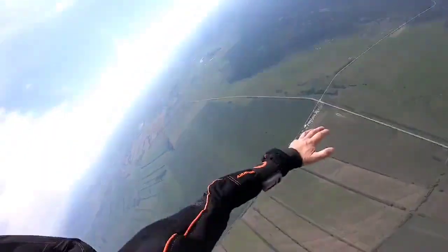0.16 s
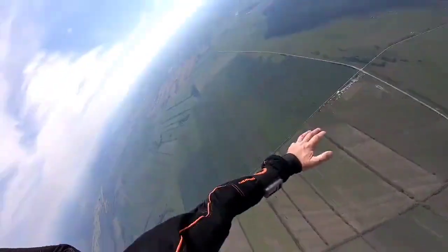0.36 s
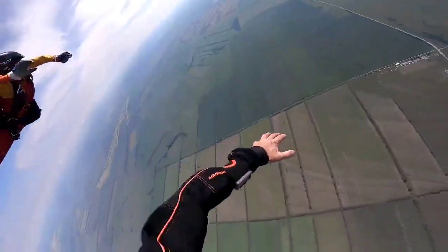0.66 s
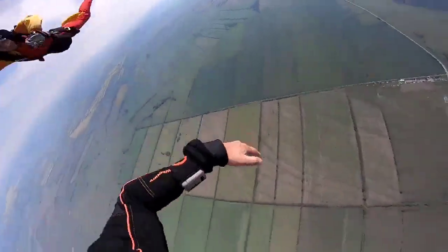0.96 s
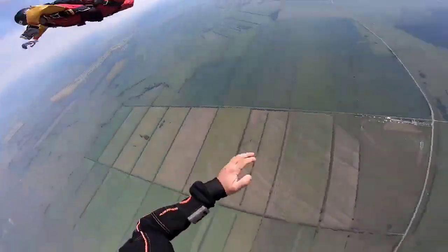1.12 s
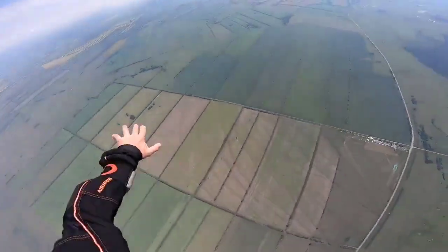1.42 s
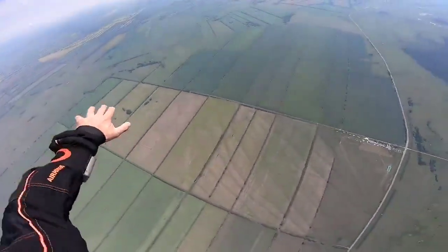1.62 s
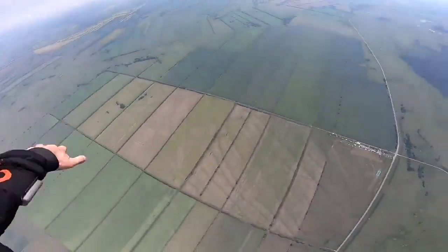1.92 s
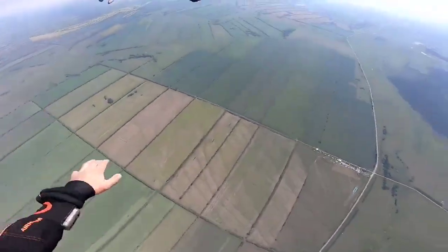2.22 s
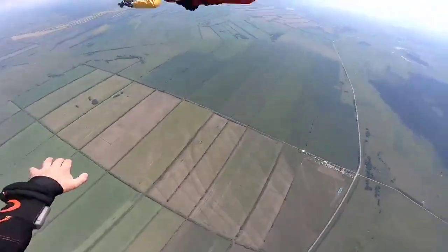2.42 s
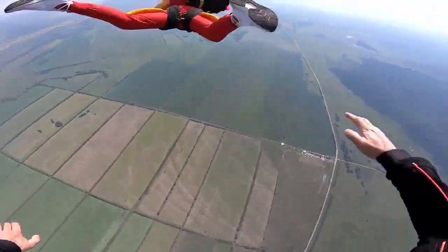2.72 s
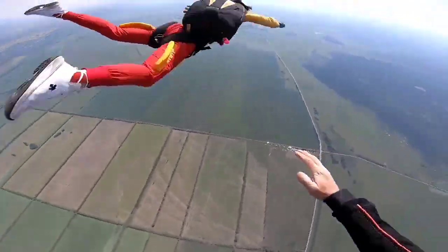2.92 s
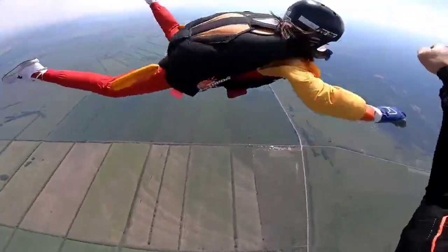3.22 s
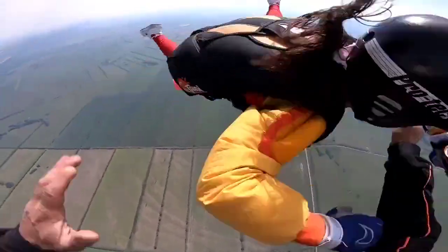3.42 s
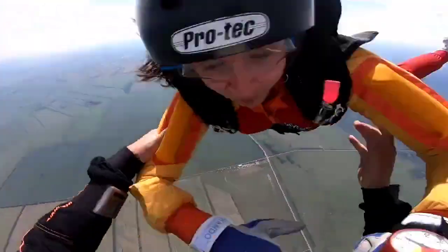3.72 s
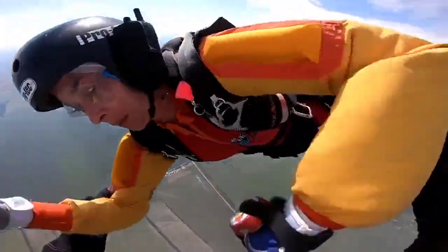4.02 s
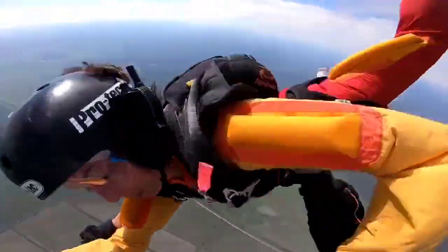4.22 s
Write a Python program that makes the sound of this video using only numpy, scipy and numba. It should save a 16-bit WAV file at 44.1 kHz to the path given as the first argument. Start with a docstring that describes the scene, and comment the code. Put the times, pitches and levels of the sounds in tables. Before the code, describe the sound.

Continuous loud freefall wind, heard from a camera worn by a skydiver high above farmland. Low buffeting and gusty roar lie under a brighter rush with a slight hollow ring. The rush peaks around one second, then recedes as the roar deepens and turns ragged, with short air slaps and tiny dips near the end. Close, dry, identical in both channels, no echo, dull at the very top.

```python
"""Freefall: air tears past a camera worn by a skydiver.
Big eddies buffet the microphone as low noise, and vortices peel off the body as a droning band of wandering pitch.
Middling eddies roar in gusts; smaller ones slap, rush and hiss at the port, whose ring near 3 kHz shifts with
the flow. A thin whistle fades early on. As the diver turns and closes on a partner, the camera moves in and out
of the wake, mostly deeper, and the roar sinks and grows ragged with it."""
import sys
import numpy as np
from scipy import signal
from scipy.fft import rfft, irfft
from scipy.io import wavfile
from scipy.ndimage import uniform_filter1d, minimum_filter1d
from numba import njit

SR = 44100
rng = np.random.default_rng(int(sys.argv[2]) if len(sys.argv) > 2 else 0)


def transcribe(signal):
    """Save signal, clipped to [-1, 1], as a 16-bit WAV file at the path in sys.argv[1]."""
    frames = np.atleast_2d(signal).T
    limited = np.clip(frames, -1, 1)
    pcm = np.round(limited * 32767).astype(np.int16)
    wavfile.write(sys.argv[1], SR, pcm)


N = 192364

# Flow across the port. Each row: time in seconds, rush in dB, hiss in dB, both before their trims.
PORT_FLOW = [(0, -26, -43.5), (.1, -21.5, -39), (.19, -25, -51.5), (.33, -31.5, -53.5), (.58, -23.5, -48.5),
             (.8, -21, -52.5), (.93, -20, -43.5), (1.1, -21.5, -47.5), (1.34, -23, -45.5),
             (1.62, -26.5, -49.5), (1.76, -24.5, -45.5), (2.2, -24, -45), (2.7, -28.5, -50),
             (2.88, -27, -48.5), (3.2, -31, -53), (3.52, -28.5, -50.5), (3.74, -32, -55),
             (3.815, -34, -55.5), (3.85, -28, -51.5), (3.92, -28, -53), (4.02, -32, -53.5),
             (4.28, -32.5, -55), (4.36, -27.5, -47)]
RUSH_TRIM_DB, HISS_TRIM_DB = -0.03, 1
# Noise colour of the largest eddies. Each row: frequency in Hz, density in dB per Hz.
BUFFET_COLOUR = [(12, -49.5), (25, -12.5), (40, -6.5), (60, 0), (78, 0.5), (115, -3), (150, -9),
                 (260, -15.5)]
# Noise colour of the finest eddies. Each row: frequency in Hz, density in dB per Hz.
HISS_COLOUR = [(2800, -19.5), (3600, 4), (4000, 2.5), (4400, 2), (4750, -3), (5250, -3.5), (5900, -7.5),
               (7300, -6.5), (8200, -28)]
# Noise colour of air that grazes the port. Each row: frequency in Hz, density in dB per Hz.
GRAZING_COLOUR = [(400, 7), (900, 6), (1300, 3.5), (1650, -2), (2000, -0.5), (2800, -1.5), (3300, -6.5),
                  (3600, -14), (4400, -27.5)]
# Noise colour of air that hits the port head-on. Each row: frequency in Hz, density in dB per Hz.
HEAD_ON_COLOUR = [(220, 3), (380, -1), (600, -5), (950, -2), (1400, 0.5), (1900, -2.5), (2800, -8.5),
                  (3350, -11), (3650, -20.5), (4400, -27.5)]
# How the air meets the port as the diver turns. Each row: time in seconds, share that hits head-on from 0 to 1.
HEAD_ON_SHARE = [(0, 0.54), (.3, 1), (.9, 0.78), (1.3, 0.45), (1.5, 0), (2.1, 0.21), (2.9, 0.05), (3.5, 0),
                 (3.74, 0.6), (3.88, 0.9), (4.05, 0.1), (4.36, 0)]
# The two resonances of the port cavity. Each row: width in Hz, average lift in dB.
PORT_RESONANCES = [(330, 3.5), (240, 7.5)]
# They shift with the angle of the flow. Each row: time in seconds, lower centre in Hz, upper centre in Hz.
PORT_CENTRES = [(0, 2400, 3050), (.6, 2400, 3220), (1, 2480, 3270), (1.499, 2470, 3260), (2.3, 2490, 3130),
                (2.8, 2430, 3130), (3.5, 2430, 3130), (4, 2500, 3240), (4.36, 2600, 3170)]
PORT_WAVER_DB = 2
# The camera in the body's wake. Each row: time in seconds, depth from 0 in clean air to 1 at its deepest.
WAKE_DEPTH = [(0, 0.31), (.5, 0.41), (.95, 0.15), (1.18, 0.35), (1.28, 0.6), (1.55, 0.41), (2.1, 0.74),
              (2.55, 0.56), (3.05, 0.55), (3.95, 0.82), (4.36, 1)]
# Each pair: value in clean air, value deep in the wake.
ROAR_DB, ROAR_HZ, FLUTTER_DB = (-29, -23.5), (560, 333), (-0.1, 6.5)
ROAR_WIDTH = 1.61  # share of its centre, per filter pass
# Gusts that swell the roar and move it to a band of their own, mostly narrower. Each row: start in seconds,
# length in seconds, lift in dB, centre in Hz, width per filter pass as a share of the centre.
ROAR_GUSTS = [(0.164, 0.17, 7, 400, 1.9), (0.289, 0.12, 2.5, 830, 1.35), (1.409, 0.3, 4.5, 495, 0.77),
              (2.039, 0.24, 2.5, 467, 1.5), (2.361, 0.473, 5, 495, 0.98), (2.785, 0.33, 4.5, 550, 1)]
GUST_ATTACK_S, GUST_RELEASE_S = 0.013, 0.09
# Moments when the wind mostly drops. Each row: middle in seconds, length in seconds, dip of rush and hiss in dB,
# dip of the roar in dB, dip of the large eddies in dB; a negative dip is a lift.
WIND_LULLS = [(0.302, .07, 3, 1.5, 2), (.535, 0.057, 1, 2, 4.5), (0.856, .06, 0.5, 10, 4),
              (1.101, 0.056, 0.5, -3, 7.5), (1.175, 0.075, -2, -1, 5), (1.688, 0.045, 2, 9, 11.5),
              (1.95, 0.047, 2.5, -3, 6.5), (2.13, 0.069, -0.5, 3, 3), (2.574, 0.08, -2.5, 9, -0.5),
              (3.03, 0.032, 0, 11, -1), (3.163, .06, 4, 4, -1.5), (3.262, 0.037, 4, 3.5, 2.5),
              (3.305, 0.032, -2.5, -1, 0.5), (3.392, .03, 3.5, 5, 2), (3.642, 0.035, 2, 11, -0.5),
              (3.721, 0.06, -1.5, 5.5, 1), (4.033, 0.1, 2, 4.5, -1), (4.188, 0.056, 5, 22, 5.5),
              (4.25, 0.033, 0.5, 8, -5)]
# Push of the largest eddies. Each row: time in seconds, level in dB.
BUFFET_LEVEL = [(0, -19.5), (.24, -13.5), (.38, -18), (.62, -18.5), (1.05, -18), (1.5, -15), (2.45, -14.5),
                (2.7, -18.5), (3.2, -17), (4.1, -20.5), (4.3, -15)]
# Vortices shed by the body. Each row: time in seconds, average shedding rate in Hz, level in dB.
BODY_SHEDDING = [(0, 130, -22.5), (.3, 129, -20.5), (.5, 112, -13.5), (.75, 120, -17.5), (1.05, 137, -17),
                 (1.3, 174, -14.5), (1.55, 195, -14.5), (1.85, 181, -16.5), (2.05, 202, -18.5),
                 (2.25, 163, -17.5), (2.55, 169, -16), (2.85, 200, -14), (3.15, 206, -12.5),
                 (3.65, 183, -11.5), (3.95, 198, -13), (4.15, 197, -13.5), (4.36, 177, -19)]
BODY_SPAN_S = .035
# Single eddies that slap the port, big ones low, small ones high. Each row: start in seconds, length in seconds,
# level in dB before the trim (a very short slap stays under it), centre in Hz.
SLAPS = [(0.148, 0.043, -19.5, 390), (0.251, 0.027, -19, 417), (.312, 0.048, -22.5, 784),
         (.37, .03, -22.5, 740), (.388, 0.023, -14, 300), (0.486, 0.03, -16, 337), (1.424, 0.048, -22, 580),
         (1.518, 0.029, -21, 320), (1.54, 0.053, -25, 620), (1.613, 0.022, -16, 560),
         (1.651, 0.027, -21.5, 520), (2.069, 0.02, -23, 700), (2.412, 0.015, -33, 750),
         (2.529, 0.022, -19, 760), (2.845, 0.023, -24, 1420), (2.91, 0.031, -22, 750),
         (2.977, 0.028, -18.5, 780), (3.06, 0.054, -14, 293), (3.143, .025, -19.5, 288),
         (3.188, 0.063, -25, 590), (3.242, 0.024, -25, 560), (3.266, 0.035, -22.5, 654),
         (3.32, 0.061, -26, 795), (3.401, 0.021, -21.5, 745), (3.506, 0.068, -25.5, 860),
         (3.654, 0.032, -26, 710), (3.825, 0.077, -24.5, 800), (3.913, 0.024, -9.5, 265),
         (4.081, .025, -24, 700), (4.131, 0.025, -22.5, 795), (4.189, 0.01, -30, 800),
         (4.226, 0.015, -14, 323), (4.257, .035, -30.5, 700), (4.338, 0.052, -25, 1100)]
SLAP_TRIM_DB, SLAP_ATTACK_S, SLAP_RELEASE_S = -0.5, .003, .02
SLAP_WIDTH = 0.74  # share of its centre, per filter pass
WHISTLE_START_S, WHISTLE_LENGTH_S, WHISTLE_FADE_S = 0.174, 1.2, .35
WHISTLE_DB, WHISTLE_HZ = -53.5, 5300
WHISTLE_WIDTH = 0.17  # share of its centre, per filter pass
CUTOFF_HZ = 8400


def from_db(db):
    """Decibels to gain."""
    return 10 ** (np.asarray(db) / 20)


def rms_one(x):
    """Scale to rms 1."""
    return x / np.sqrt(np.mean(x ** 2) + 1e-20)


def in_time(rows):
    """Draw each column as an automation curve, one value per sample."""
    seconds, *columns = np.transpose(rows)
    now = np.arange(N) / SR
    return [np.interp(now, seconds, column) for column in columns]


def between(ends, share):
    """Go from the first value to the second as the share goes from 0 to 1."""
    return ends[0] + (ends[1] - ends[0]) * share


def swell(middle_s, length_s):
    """A smooth rise and fall, 0 to 1 to 0."""
    phase = np.clip((np.arange(N) / SR - middle_s) / length_s, -.5, .5)
    return np.cos(np.pi * phase) ** 2


def gust_shape(start_s, length_s, attack_s, release_s):
    """Straight attack, hold and straight release within 0 to 1."""
    since = np.arange(N) / SR - start_s
    rise, fall = since / attack_s, (length_s - since) / release_s
    return np.clip(np.minimum(rise, fall), 0, 1)


def drift(rate_hz):
    """Random wobble, mostly slower than the given rate; rms 1."""
    lowpass = signal.butter(2, rate_hz, fs=SR, output="sos")
    slow = signal.sosfilt(lowpass, rng.standard_normal(N + SR))
    return rms_one(slow[SR:])  # the first second lets the filter settle


def turbulence(colour):
    """Random pressure: white noise shaped to the colour, falling 30 dB per octave beyond its ends; rms 1."""
    hz, db = np.transpose(colour)
    octaves = np.log2(np.maximum(np.arange(N // 2 + 1) * SR / N, 1))
    beyond = np.abs(octaves - np.clip(octaves, np.log2(hz[0]), np.log2(hz[-1])))
    shape = from_db(np.interp(octaves, np.log2(hz), db) - 30 * beyond)
    return rms_one(irfft(rfft(rng.standard_normal(N)) * shape, N))


def sustained(x, span_s):
    """The airstream never lets up: power is held near 1 over the span, quicker flutter stays."""
    size = max(int(span_s * SR), 2)
    power = uniform_filter1d(uniform_filter1d(x ** 2, size), size)
    return x / np.sqrt(power + 1e-12)


def fluttering(x, shared_db, own_db):
    """Fine turbulence arrives in packets: a shared flutter, plus one of its own."""
    return x * from_db(shared_db + own_db * drift(rate_hz=100))


def below(x, edge_hz):
    """Larger eddies carry little treble: a steep low-pass."""
    return signal.sosfilt(signal.butter(4, edge_hz, fs=SR, output="sos"), x)


@njit
def gliding_resonance(x, angle, radius):
    """Two-pole band-pass whose centre and width can change with every sample."""
    y = np.zeros(len(x))
    for i in range(2, len(x)):
        kept = radius[i] ** 2
        drive = (1 - kept) / 2 * (x[i] - x[i - 2])
        y[i] = drive + (1 + kept) * np.cos(angle[i]) * y[i - 1] - kept * y[i - 2]
    return y


def vortices(centre_hz, width_share, wander_db):
    """Almost regular eddies: noise through two passes of a band-pass whose centre wanders."""
    hz = centre_hz * from_db(wander_db * drift(rate_hz=16.6))  # the dB ratio scales the frequency
    angle = 2 * np.pi * hz / SR
    radius = np.exp(-np.pi * width_share * hz / SR)
    once = gliding_resonance(rng.standard_normal(N), angle, radius)
    return gliding_resonance(once, angle, radius)


def whistle():
    """Air passing an edge whistles as a faint, breathy band that wavers and fades away."""
    blown = gust_shape(WHISTLE_START_S, WHISTLE_LENGTH_S, GUST_ATTACK_S, WHISTLE_FADE_S)
    band = rms_one(vortices(WHISTLE_HZ, WHISTLE_WIDTH, wander_db=0.06))
    return from_db(WHISTLE_DB) * blown * band


def hiss(flutter_db):
    """The finest eddies hiss as treble noise that flutters with the flow."""
    _, level_db = in_time(PORT_FLOW)
    fine = fluttering(turbulence(HISS_COLOUR), .5 * flutter_db, own_db=1.3)
    return from_db(level_db + HISS_TRIM_DB) * sustained(fine, span_s=0.22)


def port(x):
    """The small cavity before the microphone lifts two sliding resonances, each by a wavering amount."""
    for centre_hz, (width_hz, lift_db) in zip(in_time(PORT_CENTRES), PORT_RESONANCES):
        lift = from_db(lift_db + PORT_WAVER_DB * drift(rate_hz=12))
        radius = np.full(N, np.exp(-np.pi * width_hz / SR))
        ring = gliding_resonance(x, 2 * np.pi * centre_hz / SR, radius)
        x = x + (lift - 1) * ring
    return x


def rush(flutter_db):
    """Small eddies rush across the port; the turn crossfades grazing and head-on air, and the cavity rings."""
    level_db, _ = in_time(PORT_FLOW)
    share, = in_time(HEAD_ON_SHARE)
    grazing = np.sqrt(1 - share) * turbulence(GRAZING_COLOUR)
    head_on = np.sqrt(share) * turbulence(HEAD_ON_COLOUR)
    rung = fluttering(port(grazing + head_on), 0.26 * flutter_db, own_db=0.94)
    return from_db(level_db + RUSH_TRIM_DB) * sustained(rung, span_s=0.11)


def slaps(flutter_db):
    """Single eddies burst on the port: short, rough slaps, each in a band set by its size."""
    pushes = np.array([
        from_db(level_db + SLAP_TRIM_DB) * gust_shape(start_s, length_s, SLAP_ATTACK_S, SLAP_RELEASE_S)
        for start_s, length_s, level_db, _ in SLAPS])
    strongest = pushes.argmax(axis=0)
    centre_hz = np.array(SLAPS)[strongest, 3]
    burst = below(vortices(centre_hz, SLAP_WIDTH, wander_db=0.24), edge_hz=2540)
    rough = fluttering(burst, 0.44 * flutter_db, own_db=1.0)
    return pushes.max(axis=0) * sustained(rough, span_s=0.0097)


def roar(wake, flutter_db):
    """Middling eddies roar, deeper in the wake; each gust lifts the roar and moves its band."""
    level_db, centre_hz, width = between(ROAR_DB, wake), between(ROAR_HZ, wake), ROAR_WIDTH
    for start_s, length_s, lift_db, gust_hz, gust_width in ROAR_GUSTS:
        gust = gust_shape(start_s, length_s, GUST_ATTACK_S, GUST_RELEASE_S)
        level_db = level_db + lift_db * gust
        centre_hz = between((centre_hz, gust_hz), gust)
        width = between((width, gust_width), gust)
    churn = below(vortices(centre_hz, width, wander_db=0.86), edge_hz=1490)
    ragged = fluttering(churn, 0.46 * flutter_db, own_db=0.8)
    return from_db(level_db) * sustained(ragged, span_s=.045)


def drone():
    """Vortices shed by the body drone as a broad low band that follows the shedding rate."""
    shed_hz, level_db = in_time(BODY_SHEDDING)
    shed = below(vortices(shed_hz, width_share=0.98, wander_db=1.18), edge_hz=555)
    return from_db(level_db) * sustained(shed, BODY_SPAN_S)


def buffet():
    """The largest eddies thump the microphone as low, heavy noise."""
    level_db, = in_time(BUFFET_LEVEL)
    return from_db(level_db) * sustained(turbulence(BUFFET_COLOUR), BODY_SPAN_S)


def lulls():
    """Brief smooth changes of the wind, mostly dips, as gains for rush and hiss, roar, and large eddies."""
    dip_db = sum(np.outer(dips_db, swell(middle_s, length_s)) for middle_s, length_s, *dips_db in WIND_LULLS)
    return from_db(-dip_db)


def scene():
    """All sizes of eddy press on one port, which feeds both channels; the smaller ones flutter in step."""
    wake, = in_time(WAKE_DEPTH)
    wobble = rms_one(drift(rate_hz=140) + 1.5 * drift(rate_hz=22))
    flutter_db = between(FLUTTER_DB, wake) * wobble
    rush_left, roar_left, large_left = lulls()
    fine = rush_left * (rush(flutter_db) + hiss(flutter_db))
    middling = roar_left * roar(wake, flutter_db)
    large = large_left * (buffet() + drone())
    mix = whistle() + fine + slaps(flutter_db) + middling + large
    return np.tile(mix, (2, 1))


def limiter(x, ceiling_db, hold_s):
    """The gain dips smoothly around every peak that would pass the ceiling."""
    size = max(int(hold_s * SR), 2)
    peak = np.abs(x).max(axis=0)
    allowed = np.minimum(1, from_db(ceiling_db) / (peak + 1e-9))
    return x * uniform_filter1d(minimum_filter1d(allowed, size), size)


def record(dry):
    """The camera limits the peaks and cuts the top."""
    held = limiter(dry, ceiling_db=-2.0, hold_s=0.012)
    top_cut = signal.ellip(10, .1, 80, CUTOFF_HZ, fs=SR, output="sos")
    return signal.sosfilt(top_cut, held)


dry = scene()
out = record(dry)
transcribe(out)
```